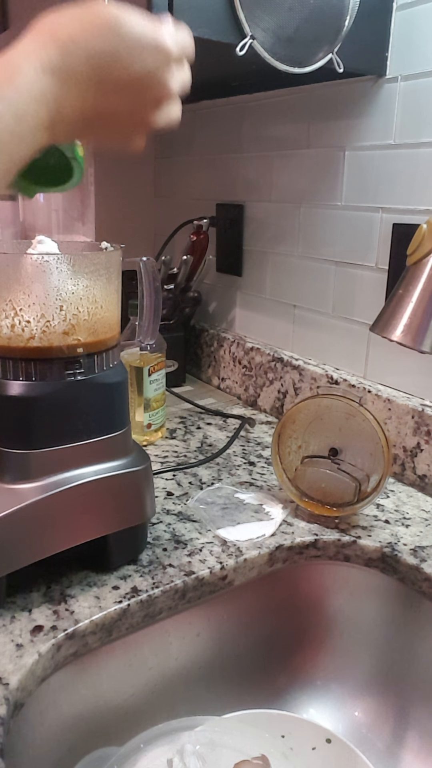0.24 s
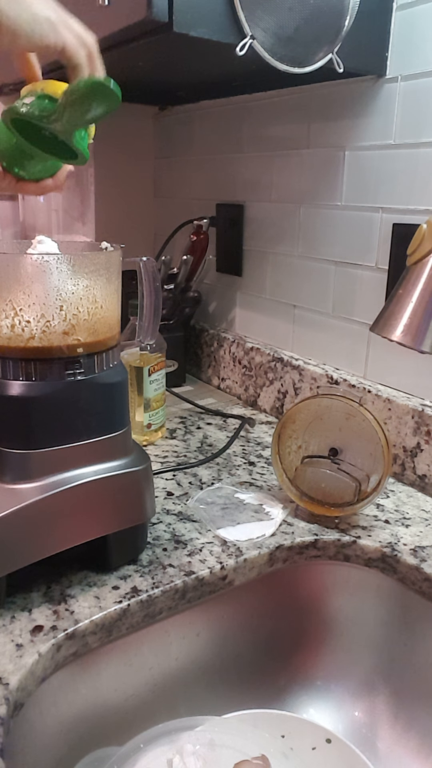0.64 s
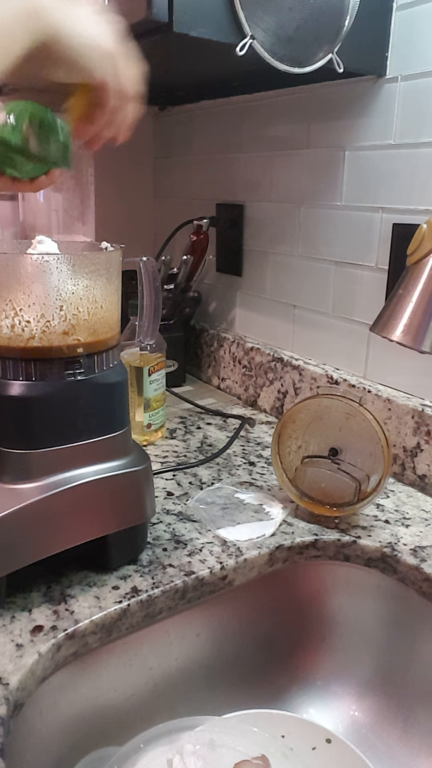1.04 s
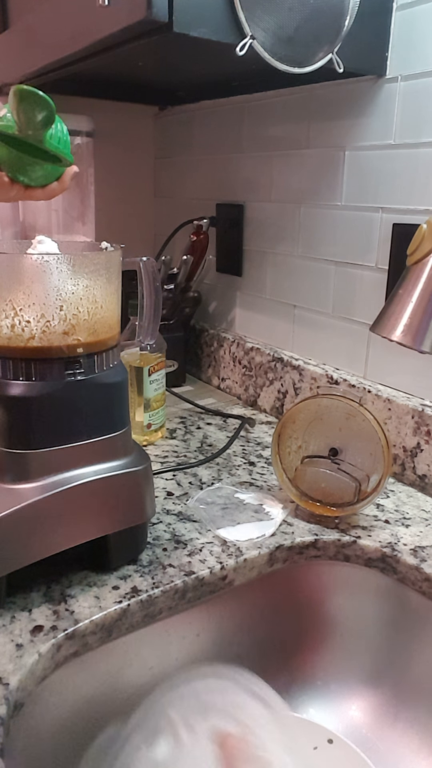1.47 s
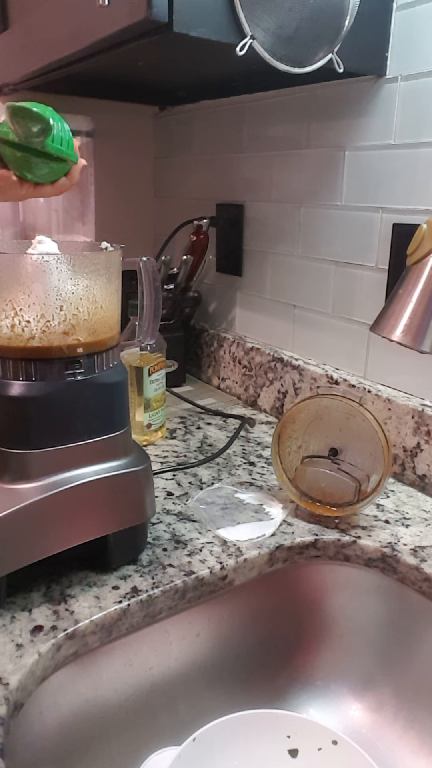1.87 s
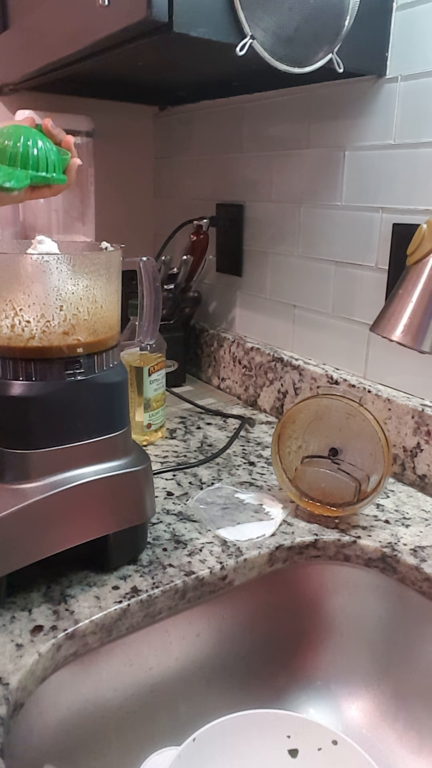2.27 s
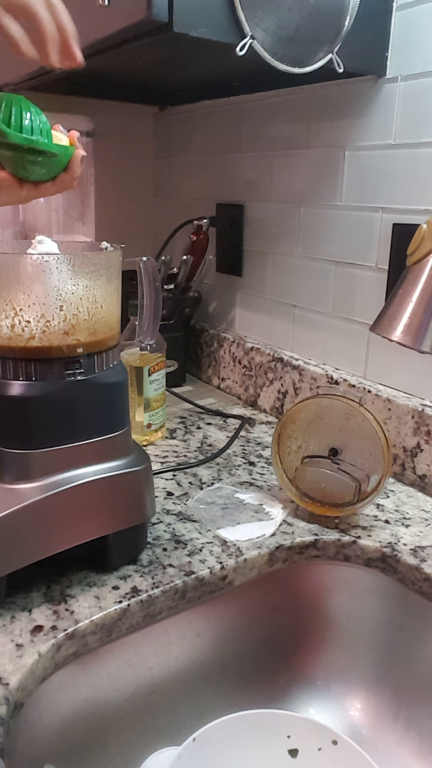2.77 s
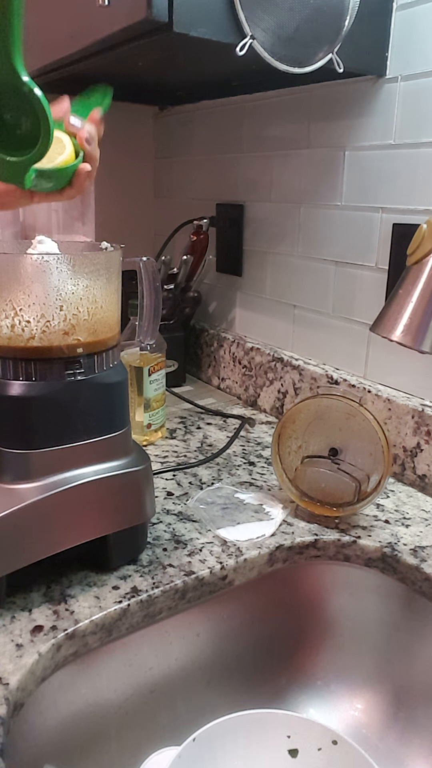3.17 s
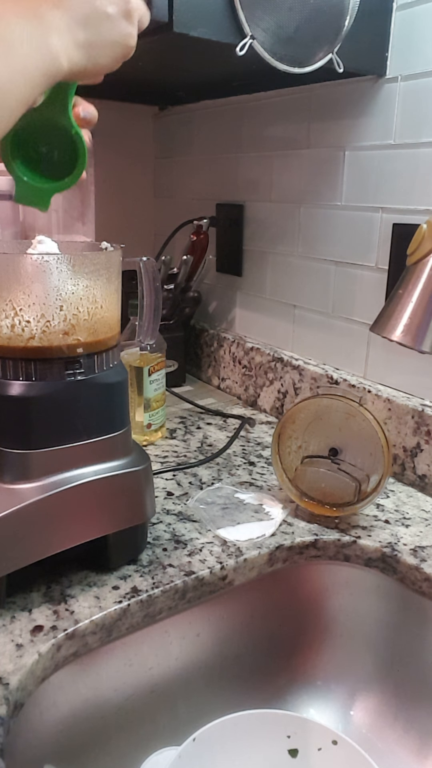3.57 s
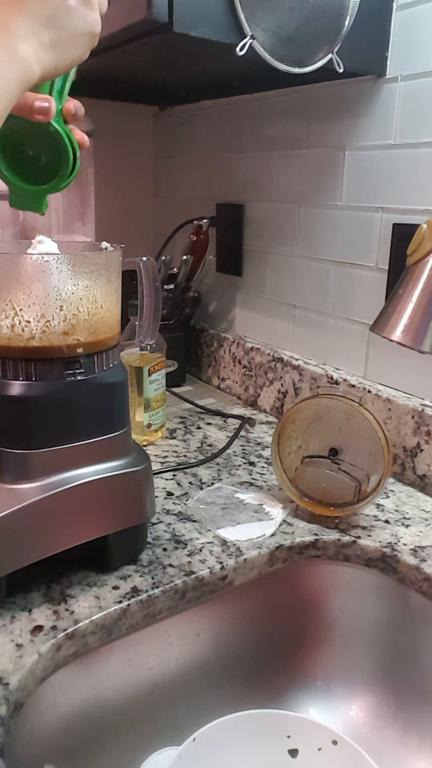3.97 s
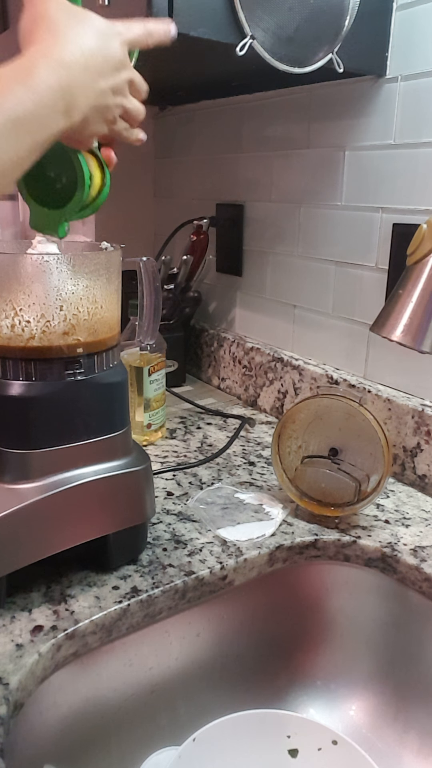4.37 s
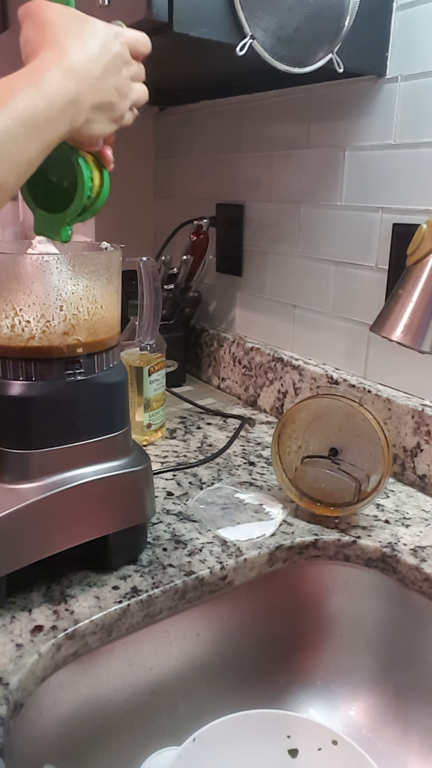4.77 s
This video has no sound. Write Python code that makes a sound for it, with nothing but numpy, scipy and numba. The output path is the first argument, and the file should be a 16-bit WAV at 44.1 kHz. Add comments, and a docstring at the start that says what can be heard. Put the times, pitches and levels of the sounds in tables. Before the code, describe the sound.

A fridge hums low and its fan hisses steadily in a home kitchen, while hands tick and rustle faintly on a lemon squeezer. A squeezed lemon half lands loudly in a bowl in a steel sink, which rings as the bowl clatters and quickly rocks to rest. Soft squeezer clicks follow, with a sharper one near the end. The phone microphone stands in a cup, sounding slightly hollow on the right.

```python
"""A fridge hums and its fan hisses in a tiled kitchen, while hands tick and rustle on a squeezer.
Then a squeezed lemon half is tossed into a bowl in a steel sink. The blows make the steel ring,
hard edges clash, and the bowl rattles and rocks to rest. A phone standing in a cup hears it all:
the air in the cup colours the sound at its lower (right) microphone and swells on one low note."""
import sys
import numpy as np
from scipy import signal
from scipy.fft import rfft, irfft, next_fast_len
from scipy.io import wavfile
from scipy.ndimage import uniform_filter1d
from numba import njit

SR = 44100
rng = np.random.default_rng(int(sys.argv[2]) if len(sys.argv) > 2 else 0)


def int16_out(signal):
    """Quantize to a 16-bit WAV file."""
    q = np.round(np.clip(np.atleast_2d(signal).T, -1, 1) * 32767)
    wavfile.write(sys.argv[1], SR, q.astype(np.int16))


N = 221444


def undb(db):
    """Turn decibels into a gain to multiply by."""
    return 10 ** (np.asarray(db) / 20)


def along(table, hz):
    """Read a (frequency, value) table between its rows, on a musical (log) scale."""
    freqs, values = np.transpose(table)
    return np.interp(np.log(hz + 1), np.log(freqs), values)


def colour(x, gain):
    """Turn each frequency of x up or down by gain(hz)."""
    size = next_fast_len(x.shape[-1] + 4096)
    hz = np.arange(size // 2 + 1) * SR / size
    return irfft(rfft(x, size) * gain(hz), size)[..., :x.shape[-1]]


def noise(length, gain):
    """Two unrelated rows of noise, coloured by gain(hz)."""
    return colour(rng.standard_normal((2, length)), gain)


def unit(x):
    """Scale to an average (rms) size of 1."""
    return x / np.sqrt(np.mean(x ** 2))


def wander(per_s):
    """A smooth random curve, about 1 in size, that heads for a new value per_s times a second."""
    hold = int(SR / per_s)
    steps = np.repeat(rng.standard_normal(N // hold + 1), hold)
    return 1.3 * uniform_filter1d(uniform_filter1d(steps, hold), hold)[:N]


def add(out, x, start_s):
    """Mix x into out from start_s on."""
    i = int(start_s * SR)
    out[:, i:i + x.shape[1]] += x[:, :N - i]


# The fridge's low notes: (pitch [Hz], level [dB])
FRIDGE_NOTES = [(40, -70), (59.3, -66), (85.9, -56.5), (120, -48.5), (171.6, -70), (237.3, -56.5)]

def fridge_hum(waver_db=1.46, drift_rad=0.58, left_lag_s=0.00022):
    """Mains buzz, motor shaft and pump: each note wavers a little and reaches the left side later."""
    t = np.arange(N) / SR - np.array([[left_lag_s], [0]])
    out = 0
    for hz, db in FRIDGE_NOTES:
        size = np.sqrt(2) * undb(db + waver_db * wander(3.37))
        phase = 2 * np.pi * (hz * t + rng.random()) + drift_rad * wander(2.48)
        out += size * np.sin(phase)
    return out


# The tone of the fan's rushing air: (frequency [Hz], relative level [dB])
FAN_COLOUR = [(25, -10), (60, -26), (100, 4), (170, -9), (300, -1), (700, -0.5), (1100, -4), (2000, 1),
              (4000, -5.5), (6500, -12.5), (9500, -13.5), (12000, -13.5), (15500, -19)]

def fan_hiss(level_db=-42.5, swell_db=-0.03, flicker_db=-0.05):
    """Moving air makes an almost steady hiss, built one octave at a time."""
    out, swell = 0, wander(1.24)
    for hz in 30 * 2. ** np.arange(10):
        octave = lambda f: np.cos(np.pi / 2 * np.clip(np.log2((f + 1) / hz), -1, 1))
        band = noise(N, lambda f: undb(along(FAN_COLOUR, f)) * octave(f))
        out += band * undb(swell_db * swell + flicker_db * wander(10))
    return unit(out) * undb(level_db)


# Fingers, rind and squeezer hinge. A fade time (t60) is how long a sound takes to drop 60 dB.
# (time [s], level [dB], pitch [Hz], fade time [s])
HAND_TOUCHES = [(.182, -42.5, 8840, 0.096), (.411, -43.5, 10500, 0.083), (0.436, -44, 7000, .12),
                (.51, -46, 10000, 0.18), (.597, -39, 3500, 0.043), (.675, -46, 9500, 0.13),
                (.915, -41, 12000, 0.18), (1.04, -46.5, 9000, 0.081), (1.32, -42, 11500, 0.11),
                (2.091, -37.5, 3350, 0.082), (2.145, -39, 1900, .06), (2.38, -40.5, 4300, 0.09),
                (3.057, -36, 1950, .11), (3.305, -35.5, 2010, 0.088), (3.535, -45, 12000, 0.084),
                (4.0, -45, 11000, 0.082), (4.079, -38.5, 1800, 0.36), (4.621, -37, 1900, 0.26),
                (4.8899, -25.5, 4730, 0.01), (4.893, -31.5, 4560, 0.082)]

def hands(left_db=-0.5):
    """Each touch is a puff of noise: short ticks are sharp and wide, long rustles soft and narrow."""
    out, t = np.zeros((2, N)), np.arange(SR // 4) / SR
    balance_db = np.array([[left_db], [-left_db]]) / 2
    for start, db, hz, t60 in HAND_TOUCHES:
        octaves = 0.33 * (0.13 / t60) ** 0.23
        rise_s = 0.28 * t60 ** 2
        band = unit(noise(len(t), lambda f: np.exp(-.5 * (np.log2((f + 1) / hz) / octaves) ** 2)))
        shape = (1 - np.exp(-t / rise_s)) * undb(-60 * t / t60)
        add(out, band * shape * undb(db + balance_db), start)
    return out


CUP_NOTE_HZ = 391
# Swells of the cup's lowest note: (time [s], peak level [dB], spread in time [s])
CUP_SWELLS = [(1.492, -5, 0.0045), (1.516, -3, .012), (1.55, -9.5, 0.02), (1.589, -14, 0.0055),
              (1.63, -15, 0.014), (1.70, -3, 0.017), (1.774, -6, 0.016), (1.825, -13, 0.0086),
              (1.87, -17, .014), (1.911, -8.5, .013), (1.959, -27, 0.018)]

def cup_swells(left_db=-14.5):
    """One pure note swells and fades while the bowl rocks, heard mostly inside the cup (right)."""
    t = np.arange(N) / SR
    size = sum(undb(db) * np.exp(-.5 * ((t - peak_s) / spread) ** 2) for peak_s, db, spread in CUP_SWELLS)
    return size * np.sin(2 * np.pi * CUP_NOTE_HZ * t) * np.array([[undb(left_db)], [1]])


def without_cup_note(x, width_hz):
    """Cut out a narrow band to leave room for the cup's swells."""
    return signal.lfilter(*signal.iirnotch(CUP_NOTE_HZ, CUP_NOTE_HZ / width_hz, SR), x)


def chatter(tone, per_s, decay_s, scatter_db=2.5):
    """Many tiny hits of uneven size, each a puff of noise that dies away in the steel."""
    hits = (rng.random(N) < per_s / SR) * undb(2 * scatter_db * rng.exponential(size=N))
    power = signal.lfilter([1], [1, -np.exp(-2 / (decay_s * SR))], hits)
    return unit(np.sqrt(power) * noise(N, tone))


# Hard edges striking each other: (time [s], level [dB], fade time [s])
EDGE_CLASHES = [(1.482, -29, 0.11), (1.5765, -25, 0.046), (1.59, -37, 0.25), (1.649, -21.5, 0.19),
                (1.672, -15.5, 0.35), (1.735, -40, 0.55)]
# Their bright tone: (frequency [Hz], relative level [dB])
EDGE_COLOUR = [(1200, -9), (2200, -13), (3200, 3.5), (4500, -6), (7000, -13), (10000, -9.5), (12500, -12.5),
               (15500, -22)]

def edge_clashes(rise_s=0.0013):
    """Hard edges clash in a bright hiss that jumps up and dies away."""
    size = 0
    for start, db, t60 in EDGE_CLASHES:
        age = np.maximum(np.arange(N) / SR - start, 0)
        size += undb(db - 60 * age / t60) * (1 - np.exp(-age / rise_s))
    return size * chatter(lambda f: undb(along(EDGE_COLOUR, f)), per_s=1200, decay_s=0.0068)


# The tone of the steel sink: (frequency [Hz], relative level [dB])
STEEL_COLOUR = [(40, -40), (70, -6), (110, -7.5), (160, -2.5), (220, 1.5), (320, -1), (395, -1.5), (470, 2),
                (800, -3.5), (1100, -11), (1600, -3), (2500, -9.5), (4000, -21.5), (15000, -33.5)]

def steel_tone(hz):
    """Sheet steel rings at so many pitches that they blur; this is its strength at hz."""
    return undb(along(STEEL_COLOUR, hz))


# How loud the bowl's rattle is as it settles: (time [s], level [dB])
RATTLE_LEVELS = [(1.482, -22), (1.545, -22), (1.576, -26.5), (1.579, -20), (1.645, -25.5), (1.65, -19.5),
                 (1.698, -12.5), (1.722, -16), (1.781, -18), (1.8, -31), (1.884, -34.5), (1.942, -67)]

def bowl_rattle():
    """The bowl chatters against the steel in quick surges."""
    level_db = np.interp(np.arange(N) / SR, *np.transpose(RATTLE_LEVELS), left=-120, right=-120)
    rattle = undb(level_db) * chatter(steel_tone, per_s=630, decay_s=0.016)
    return without_cup_note(rattle, width_hz=45)


# Blows between peel, bowl and sink: (time [s], level [dB], pitch [Hz], width [octaves], fade time [s])
BLOWS = [(1.4822, -12.5, 750, 0.83, 0.18), (1.490, -19, 634, 1.4, 0.16), (1.504, -13, 495, 1.5, 0.48),
         (1.505, -31, 2750, 0.45, 0.52), (1.530, -20.5, 1050, 0.57, 0.46), (1.556, -23, 165, .59, 0.17),
         (1.576, -10.5, 1680, 0.94, 0.052), (1.587, -23, 1500, 1.4, 0.29), (1.606, -24, 680, .65, 0.077),
         (1.6507, -18, 295, 0.91, 0.14), (1.652, -17, 1160, 1.2, .12), (1.672, -14.5, 2240, 2.3, .25),
         (1.688, -16, 1240, 2.5, 0.12), (1.700, -17.5, 607, 3.2, 0.16), (1.730, -18.5, 2730, 1.04, 0.35),
         (1.743, -24, 890, 2.5, .19), (1.765, -27, 99, 0.77, 0.17), (1.775, -27, 910, 2.1, 0.15),
         (1.862, -63, 495, 1.7, .12), (1.884, -26, 550, 1.55, .07), (1.905, -34.5, 320, 0.41, 0.14)]
# The clear notes the sink rings at: (pitch [Hz], relative level [dB], fade time [s])
SINK_NOTES = [(101, -19, .3), (157.6, 6.5, 0.49), (235, -23, 0.12), (305, -16, 0.24), (543, 6.5, 0.064),
              (722, 3, 0.17), (835, -25, 0.12), (915, -28, 0.24), (1115, 3, 0.27), (1437, 4.5, 0.11),
              (1630, 6, 0.061), (1828, 9.5, 0.17)]

def sink_knocks(notes_db=-12, scatter_db=3.0, crack_gain=2.24, crack_cycles=2.1, rise_s=0.00037):
    """Each blow gives a short crack, a blurred ring of steel around its pitch, and the sink's notes."""
    out, t = np.zeros((2, N)), np.arange(SR // 2) / SR
    for start, db, hz, octaves, t60 in BLOWS:
        contact = lambda f: 1 / (1 + (np.log2((f + 1) / hz) / octaves) ** 4)  # pitches the blow stirs up
        ring = unit(noise(len(t), lambda f: steel_tone(f) * contact(f)))
        crack = crack_gain * np.sin(2 * np.pi * hz * t) * np.exp(-t * hz / crack_cycles)
        blow = crack + ring * undb(-60 * t / t60) * (1 - np.exp(-t / rise_s))
        for note_hz, note_db, note_t60 in SINK_NOTES:
            # where the blow lands sets each note's sign and strength, picked here by chance
            sign = rng.choice([-1, 1], (2, 1))
            strength = undb(note_db + notes_db + scatter_db * rng.standard_normal((2, 1)))
            note = np.sin(2 * np.pi * note_hz * t) * undb(-60 * t / min(note_t60, t60))
            blow += sign * strength * contact(note_hz) * note
        add(out, undb(db) * blow, start)
    # trim the deep rumble from the knocks so they sound tight
    out = signal.sosfilt(signal.butter(3, 80, "high", fs=SR, output="sos"), out)
    return without_cup_note(out, width_hz=50)


# How alike the two microphones hear a sound: (frequency [Hz], base likeness [0-1])
MIC_LIKENESS = [(60, 1), (200, 0.7), (400, 0.91), (800, 0.6), (1500, 0), (15000, 0)]

def two_mics(x, alike):
    """Turn two unrelated rows into left and right that share bass; a higher alike shares more."""
    shared = lambda hz: np.clip(along(MIC_LIKENESS, hz) ** (1 / alike), 0, 1)
    separate = lambda hz: np.sqrt(1 - shared(hz) ** 2)
    return np.array([x[0], colour(x[0], shared) + colour(x[1], separate)])


# Where the air in the cup rings: (peak [Hz], peak width [Hz], dip [Hz], dip width [Hz])
CUP_RESONANCES = [(398.3, 16.6, 498.6, 7.5), (698.4, 38, 719, 50), (920, 49, 894, 66),
                  (1081.4, 92.5, 1260, 16), (1506, 188, 1868, 1090), (2935, 306, 2954, 1290),
                  (4153, 930, 4966, 1370)]
# The broad tone under those peaks and dips: (frequency [Hz], gain [dB])
CUP_COLOUR = [(100, -14), (600, -9), (1500, -11), (3000, -14.5), (5000, 2.5), (7000, -1), (10000, 0.5),
              (15000, 0.5)]

def cup_air(hz):
    """The cup's air boosts some pitches; near each is a dip where it cancels the direct sound."""
    gain = undb(along(CUP_COLOUR, hz))
    for peak, peak_width, dip, dip_width in CUP_RESONANCES:
        gain = gain * (dip ** 2 - hz ** 2 + 1j * hz * dip_width)
        gain = gain / (peak ** 2 - hz ** 2 + 1j * hz * peak_width)
    return gain


def scene():
    """Mix the bowl, fan, hands and hum, pass the right side through the cup, then add its swells."""
    bowl = two_mics(sink_knocks() + bowl_rattle() + edge_clashes(), alike=0.78)
    left, right = bowl + two_mics(fan_hiss(), alike=0.92) + hands() + fridge_hum()
    return np.array([left, colour(right, cup_air)]) + cup_swells()


@njit
def follow(x, attack, release):
    """Trail behind x, rising at the attack rate and sinking at the release rate."""
    out, level = np.empty(len(x)), x[0]
    for i in range(len(x)):
        level += (x[i] - level) * (attack if x[i] > level else release)
        out[i] = level
    return out


def record(dry, port_hz=9600, port_width_hz=1900, port_db=5.5,
           threshold_db=-33.5, ratio=1.25, attack_s=0.033, release_s=0.59, ceiling=0.95):
    """The microphone's opening rings; the phone turns down after loud sound and creeps back up."""
    wet = colour(dry, lambda f: 1 + (undb(port_db) - 1) / (1 + (2 * (f - port_hz) / port_width_hz) ** 2))
    loud_db = 10 * np.log10(uniform_filter1d(np.mean(wet ** 2, axis=0), size=1024) + 1e-12)
    over_db = follow(np.maximum(loud_db - threshold_db, 0), 1 / (attack_s * SR), 1 / (release_s * SR))
    wet = wet * undb(-over_db * (1 - 1 / ratio))
    wet = wet / (1 + np.abs(wet / ceiling) ** 4) ** .25  # round off the loudest peaks
    treble_cut = signal.ellip(10, .2, 70, 15850, fs=SR, output="sos")
    return signal.sosfilt(treble_cut, wet)


dry = scene()
out = record(dry)
int16_out(out)
```